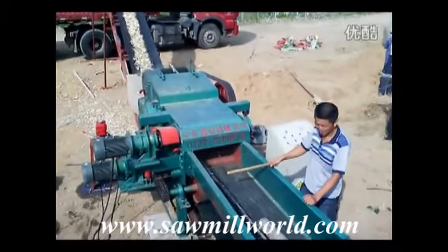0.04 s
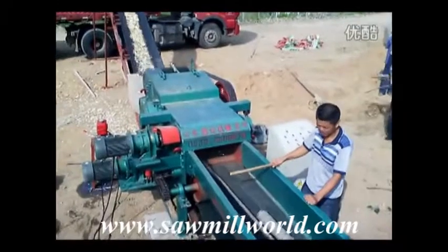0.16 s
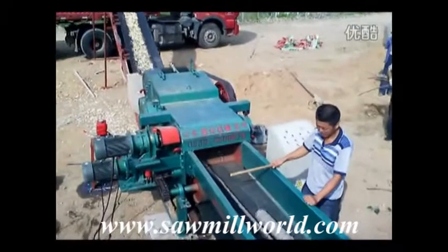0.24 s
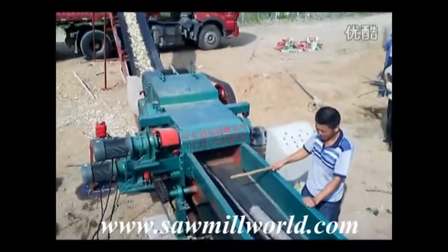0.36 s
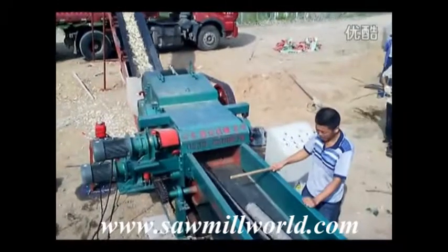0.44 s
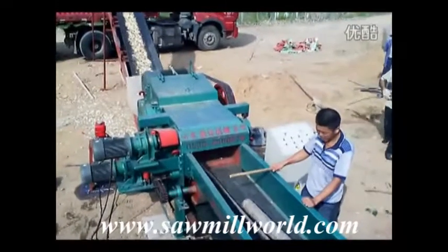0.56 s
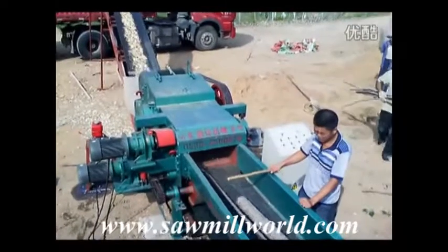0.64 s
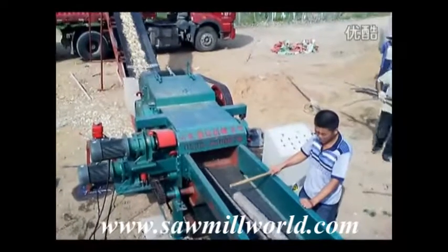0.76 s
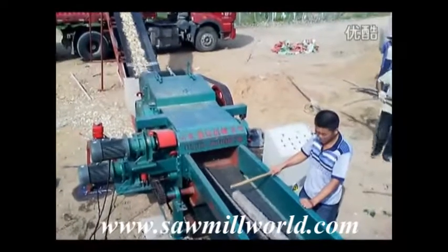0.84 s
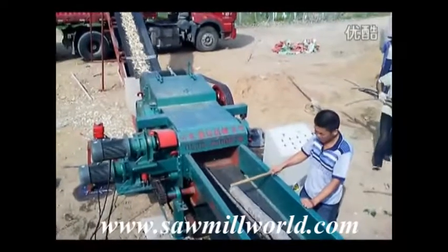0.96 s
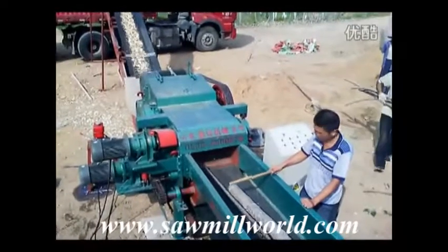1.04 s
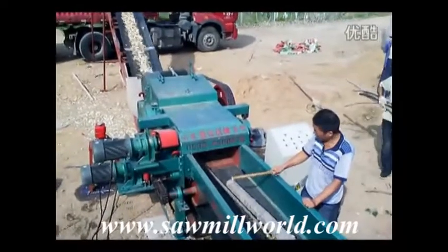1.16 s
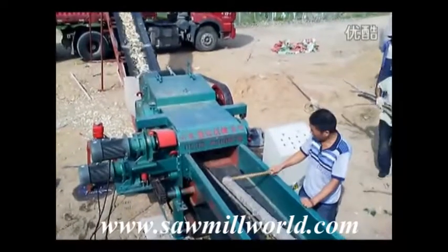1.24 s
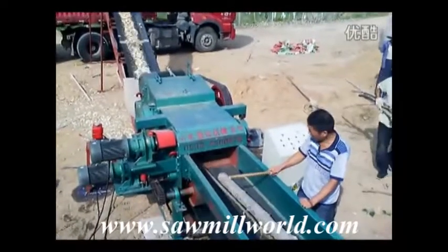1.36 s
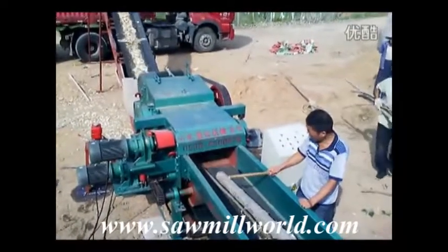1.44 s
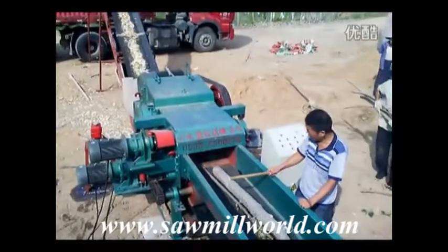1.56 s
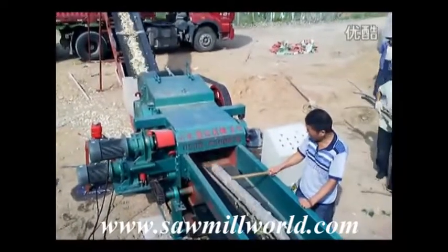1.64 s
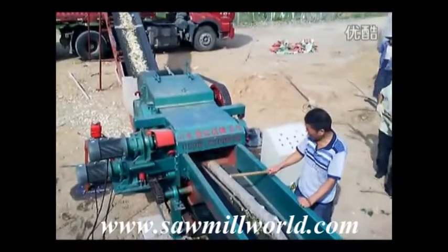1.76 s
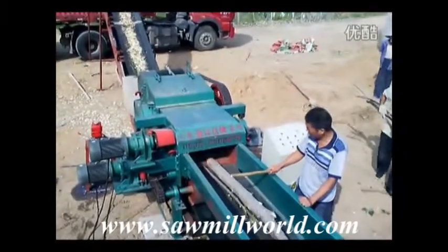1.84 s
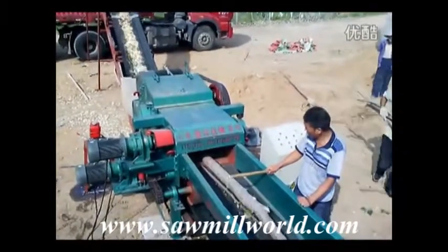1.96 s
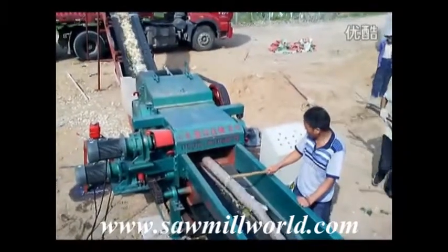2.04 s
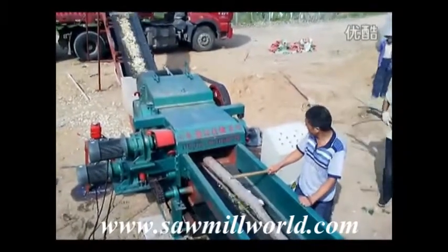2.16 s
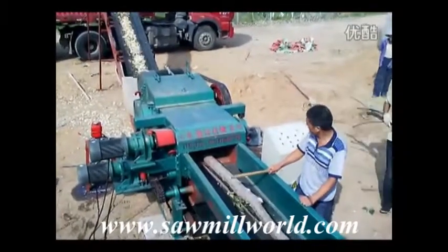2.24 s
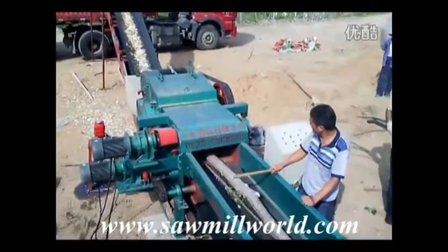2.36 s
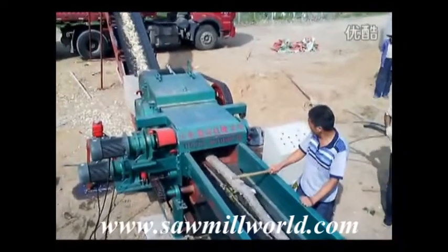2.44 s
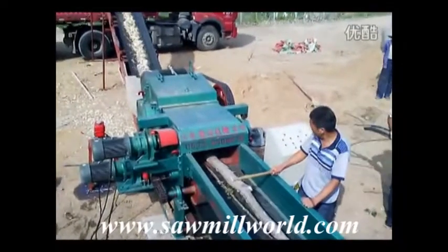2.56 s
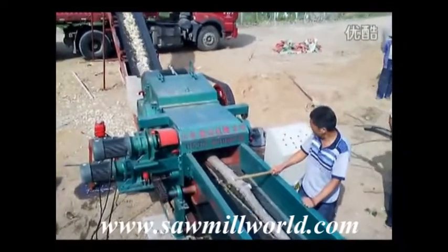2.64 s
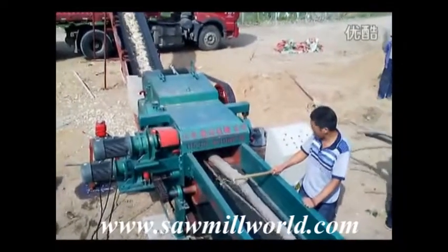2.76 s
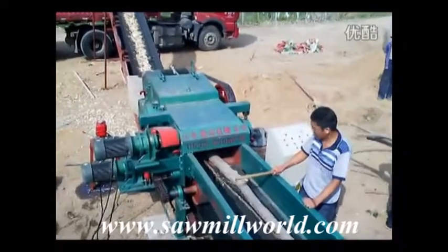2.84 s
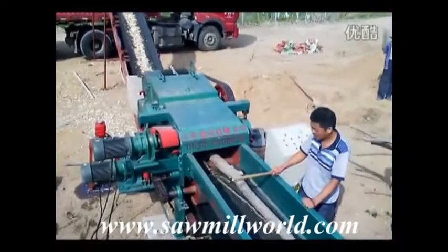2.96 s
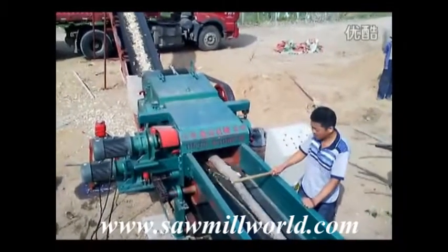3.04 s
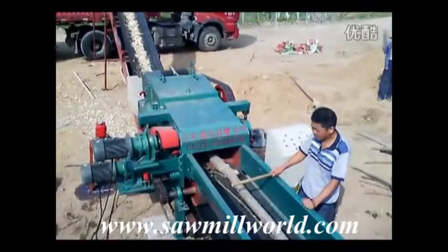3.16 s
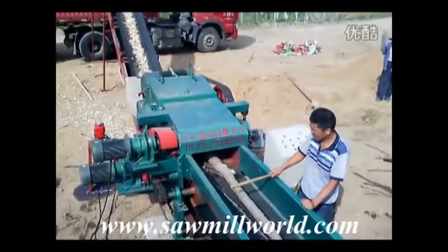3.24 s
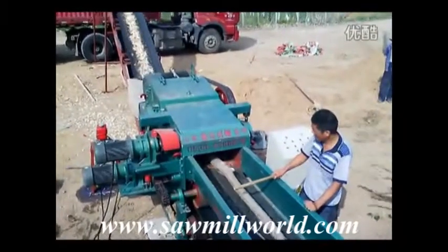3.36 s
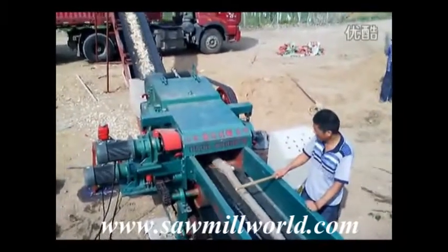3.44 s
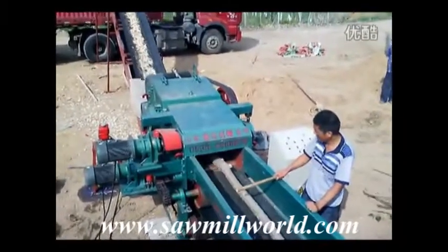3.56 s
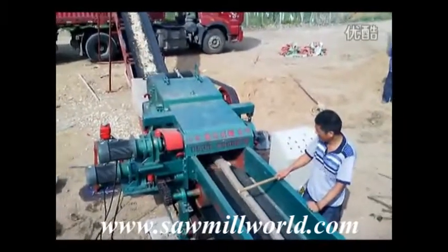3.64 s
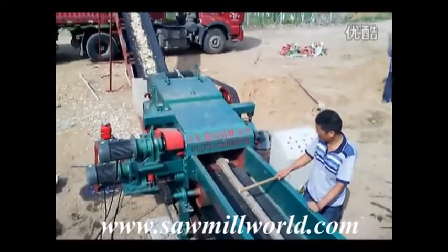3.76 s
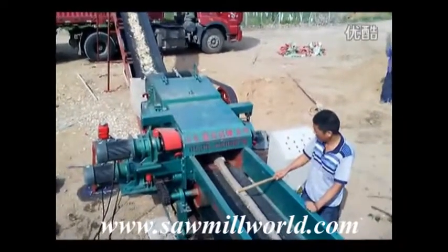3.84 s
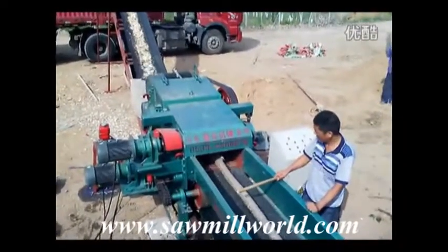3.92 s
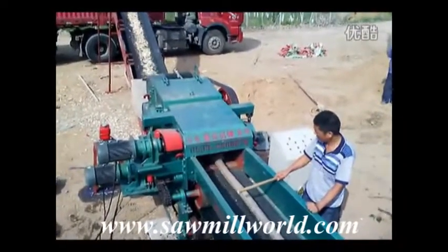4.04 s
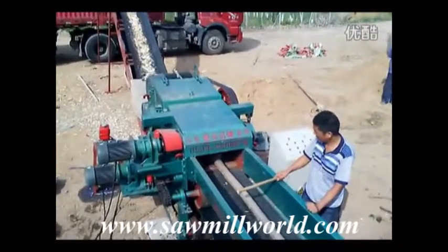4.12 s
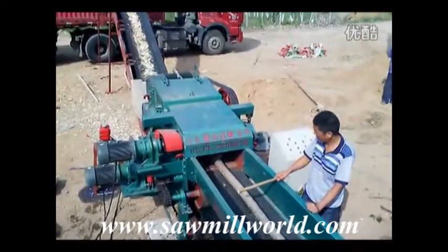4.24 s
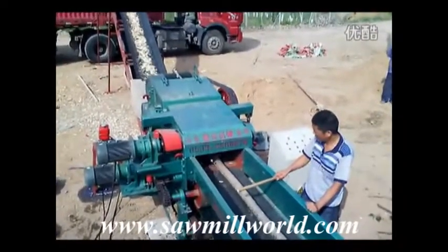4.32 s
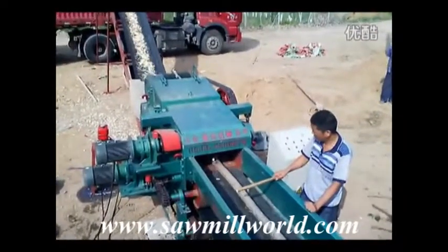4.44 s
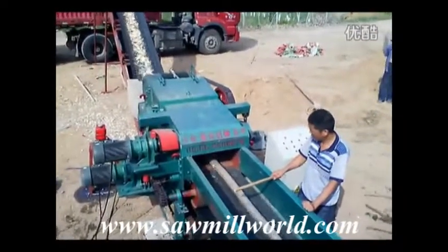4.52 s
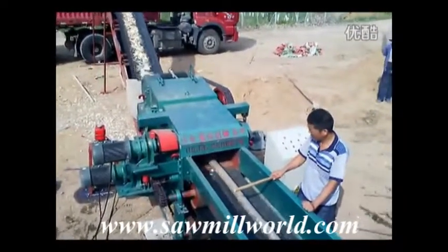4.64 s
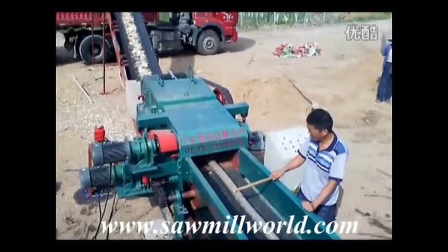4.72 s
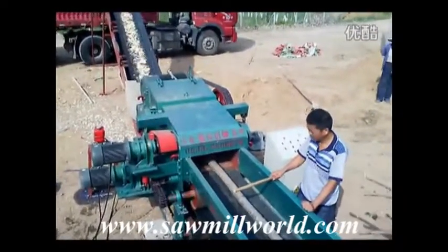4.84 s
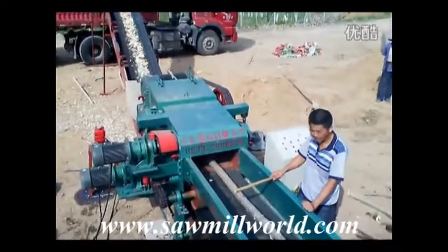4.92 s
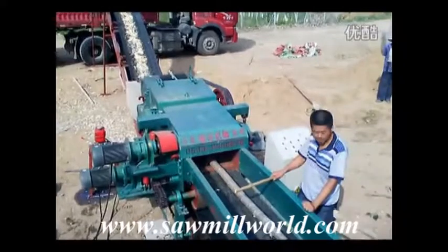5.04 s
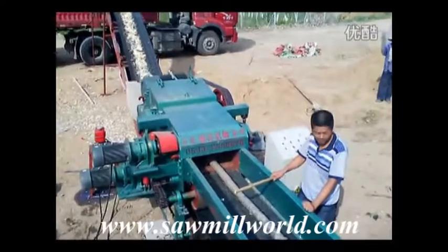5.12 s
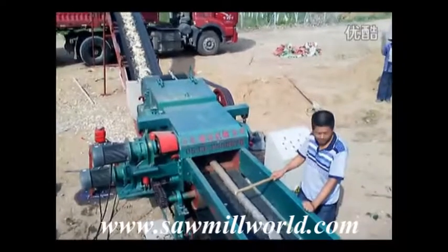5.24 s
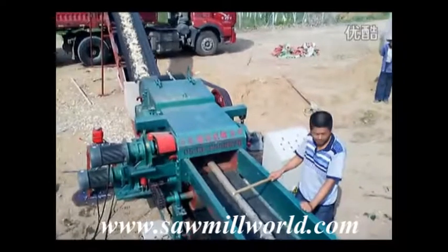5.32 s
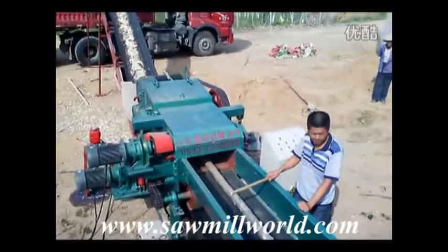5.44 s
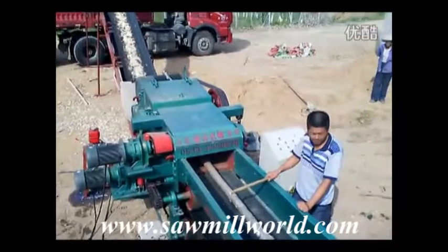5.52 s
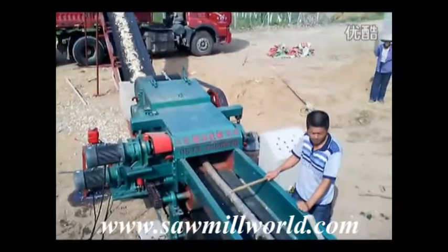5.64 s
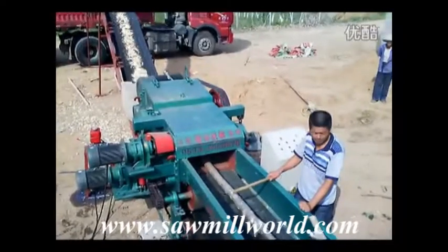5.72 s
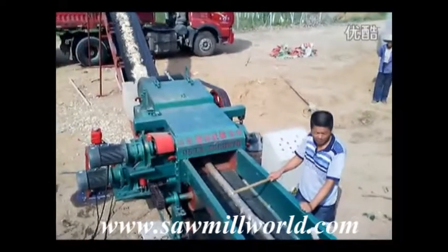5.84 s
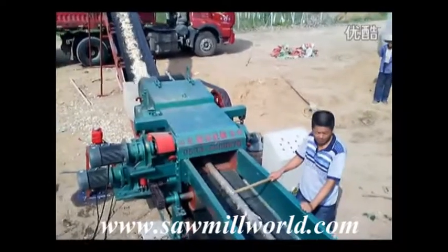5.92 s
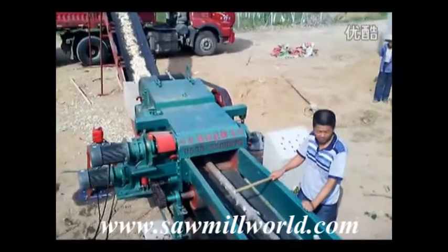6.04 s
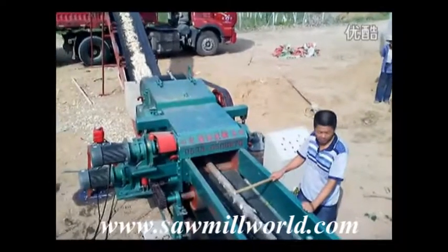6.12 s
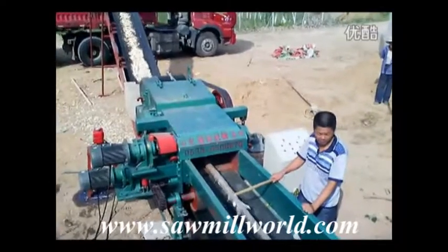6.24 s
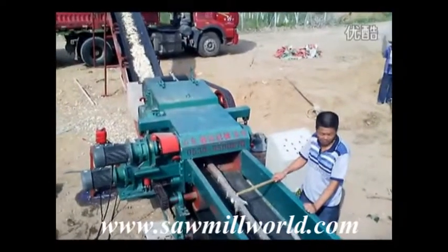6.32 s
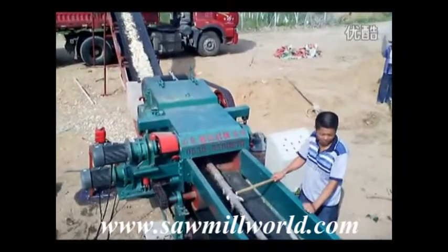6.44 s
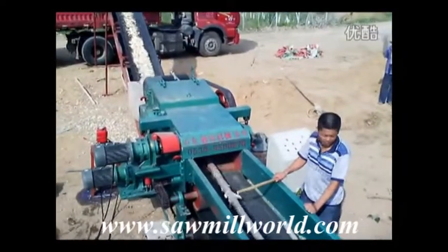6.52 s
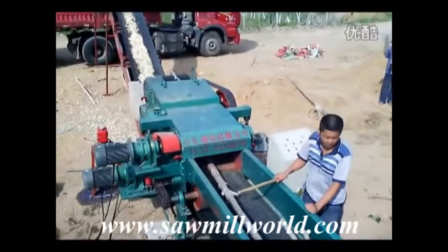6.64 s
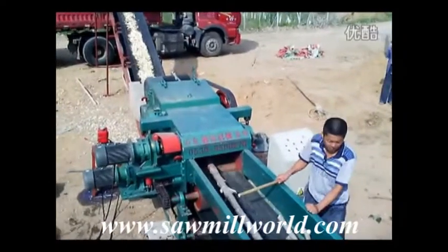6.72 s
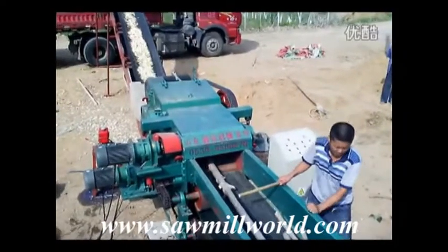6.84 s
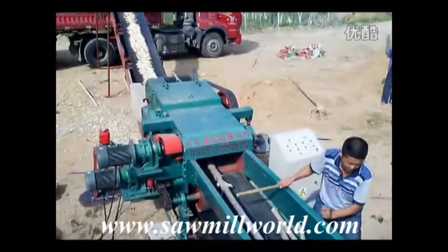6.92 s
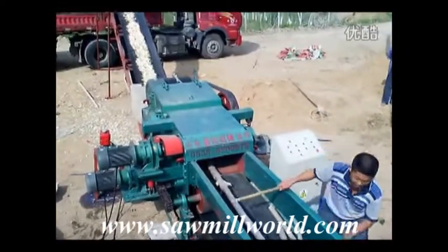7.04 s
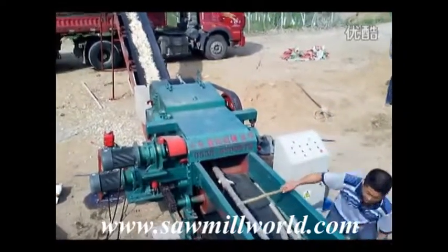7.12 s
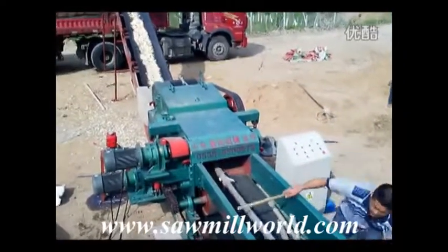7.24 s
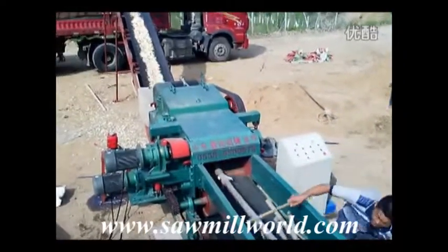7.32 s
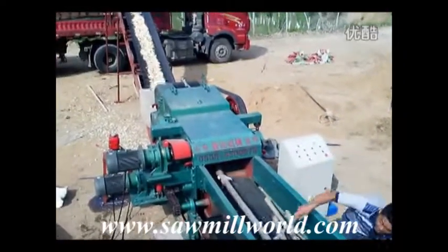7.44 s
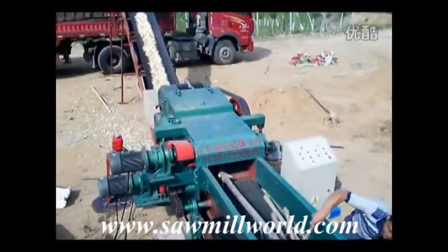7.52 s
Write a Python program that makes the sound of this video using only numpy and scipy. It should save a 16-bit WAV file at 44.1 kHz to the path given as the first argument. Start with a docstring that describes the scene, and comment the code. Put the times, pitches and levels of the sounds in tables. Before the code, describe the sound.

Quick bright knife ticks over a faint machine rumble fade down, then heavy wooden bumps, a short groan and sustained, violent, clattering log chipping.

```python
"""Drum chipper taking a log

An electric drum chipper runs in an open yard, its knives passing the anvil twenty times a second.
At first they only nick loose splinters, each a short burst of ringing noise. Then a log bumps and groans
under the feed roller, and every knife shears off a slice: a crack, a lower ring of the log, then
showers of chips round the steel hood. Motor tones, hum and a throbbing rumble lie beneath.
The loudest cuts overload the nearby microphone.
"""
import sys
import numpy as np
from scipy import signal
from scipy.fft import rfft, irfft, next_fast_len
from scipy.io import wavfile
from scipy.ndimage import uniform_filter1d, map_coordinates

SR = 44100
rng = np.random.default_rng(int(sys.argv[2]) if len(sys.argv) > 2 else 0)


def materialize(psi):
    """Save the field psi as 16-bit PCM at rate SR to the path in sys.argv[1].

    A 1-D psi becomes a single channel; in a 2-D psi each row is a channel.
    """
    bounded = np.clip(np.atleast_2d(psi).T, -1, 1)
    quanta = np.round(bounded * 32767).astype(np.int16)
    wavfile.write(sys.argv[1], SR, quanta)


N = 334278

# Levels are set before the ring of the hood and the microphone. Spectra give the balance only.

# running count of knives past the anvil: time_s, knife_passes
KNIFE_COUNT = [(0, -.6), (3.16, 63), (3.401, 68), (4.899, 98), (5.647, 113), (6.543, 131), (7.092, 142),
               (7.588, 152)]
BITE_S = 3.24  # the knives reach the log
HIT_S = np.arange(4096) / SR  # time since a blow: every blow is cut off after 93 ms

# how the log cuts as it feeds in; crack is the mean of the two knives:
# time_s, body_db, crack_db, crack_hz, spray_db
FEED = [(3.26, -45, -31.5, 2260, -37), (3.3, -45, -33, 2250, -45), (3.35, -18.5, -23.5, 1970, -24),
        (3.52, -26.5, -22.5, 2400, -30), (3.75, -13, -15, 2500, -24.5), (4.05, -22, -15, 2250, -25.5),
        (4.45, -16.5, -15.5, 2420, -28), (4.72, -14, -17, 2440, -26), (4.9, -20.5, -18, 2170, -26),
        (5.05, -14, -17, 2260, -33), (5.35, -12.5, -19, 2360, -32.5), (5.6, -18.5, -15, 2530, -29.5),
        (5.9, -21, -17.5, 2400, -27.5), (6.15, -37, -10.5, 2780, -24.5), (6.4, -30.5, -22, 2540, -27),
        (6.65, -15, -16, 2870, -25.5), (6.82, -27.5, -16.5, 2820, -27), (7.05, -19, -16.5, 2550, -28.5),
        (7.38, -20.5, -14, 2860, -23.5), (7.55, -32, -24, 2670, -35)]
# the first bite and the hardest blows, a full slice each: start_s, body_db, crack_db, crack_hz, clatter_db
HARD_CUTS = [(3.265, -29, -23, 2250, -21), (3.401, -13, -8.5, 2420, -18), (3.451, -17, -7.5, 2290, -35),
             (3.552, -15.5, -6, 2220, -23), (3.651, -13, -10.5, 2270, -22.5),
             (3.801, -15.5, -12, 2370, -20.5), (4.049, -17, -11, 2350, -18), (4.15, -15.5, -9, 2490, -37),
             (4.249, -18.5, -9.5, 2460, -35), (4.35, -21, -10, 2360, -27), (4.848, -13.5, -11, 2390, -32),
             (5.201, -22.5, -10.5, 2255, -26), (5.248, -12.5, -18.5, 2220, -22.5),
             (5.548, -22, -11.5, 2280, -26.5), (5.748, -22, -12, 2540, -18), (5.844, -22.5, -12, 2540, -21),
             (5.9439, -25, -10, 2410, -16.5), (6.045, -42, -10, 2520, -20),
             (6.1436, -28.5, -10.5, 2580, -17), (6.197, -36, -11, 2970, -19), (6.343, -14, -8, 2610, -25.5),
             (6.443, -14, -8.5, 2550, -37), (6.543, -15.5, -8, 2424, -29),
             (6.891, -10.5, -16.5, 3090, -21.5), (6.9922, -12.5, -18, 2540, -19.5),
             (7.241, -18, -12.5, 2720, -18), (7.438, -17.5, -14, 2960, -21)]
PROUD_DB = 1.65  # one knife stands proud: it cracks this much above the mean, its partner as much below
BODY_HZ, BODY_SAG_HZ_PER_S = 1450, 35  # the log's own ring at the bite, and its fall as the log feeds in
CLATTER_DB, FILL_DB, FILL_S = -19.5, 16.5, 0.15  # full hood; how much weaker at the bite; time to fill
CUT_SCATTER_DB, CUT_DETUNE, CUT_JITTER_S = 1.5, 0.057, 0.000802  # from one slice to the next
# chips clattering in the hood: freq_hz, relative_db
CLATTER_SPECTRUM = [(550, -35.5), (800, -17.5), (920, 1), (1400, 5.5), (1850, -3), (2400, 6.5),
                    (3100, -3.5), (3700, -3), (4300, -25.5), (7000, -58)]
# fine chips against the hood: freq_hz, relative_db
SPRAY_SPECTRUM = [(2500, -30), (3900, -19), (4850, -5), (5300, 0.5), (6100, 2.5), (7000, 8), (9000, -12.5),
                  (11000, -6), (15000, -27)]
# long splinters tearing off: time_s, level_db
TORN_SPLINTERS = [(3.25, -36), (3.45, -28.5), (4.3, -33.5), (4.75, -22.5), (5.05, -38.5), (7.5, -64)]
CHIP_RING_DB = 7  # typical spread of the resonances in the most ringing chip streams

# the loudest splinters nicked by a knife; a sharper one has a weaker tail:
# start_s, low_ring_db, high_ring_hz, high_ring_db, sharpness_db
LOUD_NICKS = [(0.08, -19.5, 5000, -31, -17), (.135, -22.5, 4840, -41, 11), (.278, -17.5, 4770, -32, -19),
              (.484, -28.5, 3460, -38, -17), (.629, -29.5, 4800, -17, 20.5), (.729, -26, 4110, -29.5, -9),
              (0.777, -31.5, 3800, -30, -3), (.927, -19.5, 4470, -20, 10), (.975, -24, 4820, -23, 18),
              (1.027, -25.5, 4670, -29.5, 19), (1.075, -30.5, 5020, -17.5, 28),
              (1.125, -30.5, 4900, -22.5, 21), (1.325, -31, 4800, -25, 20), (1.423, -27.5, 4890, -15, 23),
              (1.473, -26, 5000, -39, -2), (1.5206, -24, 5260, -36, 13), (1.918, -38, 4640, -26.5, 5),
              (1.966, -49, 4480, -33, 3), (2.116, -44, 5530, -32, -1), (2.465, -48, 3800, -34, 9),
              (3.112, -40, 5100, -37, -6)]
# the lighter debris that the other passes catch: time_s, low_ring_db, high_ring_db, spray_db
DEBRIS = [(0, -29, -52, -30.5), (.25, -26.5, -38, -39), (.42, -45, -57, -36.5), (.78, -28.5, -45, -28.5),
          (1.2, -34.5, -46, -34.5), (1.45, -49, -39, -25), (1.72, -37, -54.5, -40.5), (1.95, -61, -64, -26),
          (2.3, -44, -42.5, -53), (2.65, -50.5, -42, -35), (3.2, -56, -53, -54)]
NICK_LOW_HZ, NICK_HIGH_HZ, NICK_SHARP_DB = 2540, 4530, 13  # a typical splinter
NICK_SCATTER_DB, NICK_DETUNE = 4.5, 0.052  # from one splinter to the next

# the shuddering log and trough: time_s, thud_db, knock_db, groan_db, rattle_db
LOG_LEVELS = [(3.28, -12.5, -21, -23.5, -37), (3.4, -38, -32.5, -30.5, -27),
              (3.56, -31.5, -36.5, -61.5, -47), (3.72, -46.5, -29.5, -28.5, -40.5),
              (3.95, -35.5, -28.5, -32.5, -43.5), (4.15, -46, -30.5, -37.5, -32.5),
              (4.37, -48, -36.5, -46, -41), (4.62, -43.5, -39, -26.5, -29), (4.84, -41, -40.5, -28, -26),
              (4.94, -62.5, -47.5, -41.5, -36), (5.07, -32, -30.5, -29.5, -21), (5.22, -37, -46, -48, -40),
              (5.36, -30, -25.5, -27, -30.5), (5.52, -27, -41, -32, -32.5),
              (5.64, -47, -47.5, -46.5, -40.5), (6.4, -56.5, -59, -62, -46), (7.55, -55, -58, -54, -48.5)]
# lowest boom of the trough: freq_hz, relative_db
THUD_SPECTRUM = [(30, -19), (75, -20.5), (110, -11), (160, 4), (210, -1.5), (300, -24), (600, -100)]
# knocking of the trough: freq_hz, relative_db
KNOCK_SPECTRUM = [(140, -34.5), (220, -2), (255, 4.5), (295, 2), (350, -0.5), (520, -40.5)]
# groaning of the trough: freq_hz, relative_db
GROAN_SPECTRUM = [(250, -43), (360, 0.5), (410, 0), (460, -2), (515, -2), (600, -9), (850, -60)]
# rattling of the panels: freq_hz, relative_db
RATTLE_SPECTRUM = [(400, -57), (600, -5), (690, 0.5), (800, 3.5), (905, -6), (1050, 5), (1700, -36.5)]

# wood bumps the trough and the feed roller: start_s, pitch_hz, level_db, t60_s
BUMPS = [(.018, 173, -13.5, 0.071), (.414, 176, -27, 0.062), (.478, 193, -22.5, 0.082),
         (1.685, 301.5, -13.5, 0.088), (1.689, 398, -24.5, 0.2), (3.108, 160.5, -17, .45),
         (3.145, 185, -14.5, .13), (3.195, 154, -14, 0.29), (3.223, 155.5, -3, 0.22),
         (3.226, 275, -9.5, 0.098), (3.257, 793, -10.5, 0.076), (3.346, 160, -11, 0.094),
         (3.383, 308, -16, 0.23), (5.362, 151.5, -9.5, 0.066), (6.018, 197, -24, 0.063)]
BUMP_RISE_S = 0.017  # bark cushions every contact
# the log drags under the feed roller: time_s, pitch_hz, level_db
DRAG = [(3.255, 387, -52), (3.272, 406.7, -18.5), (3.32, 408.3, -14.5), (3.345, 416.5, -14),
        (3.365, 493, -14.5), (3.42, 476, -54)]
# resonances of the steel hood and trough: freq_hz, width_hz, strength_db
PANELS = [(249, 8.1, -10.5), (290.7, 9.3, 3.5), (409, 19, -4.5), (510, 9.6, -1.5), (895, 8.5, 6),
          (1400, 22, -20), (2420, 32, -8.5), (4480, 31, -3), (4814, 77, 4), (5990, 120, -0.5)]

# dust and crumbs sweeping the hood, before each knife's flick: time_s, level_db
DUST_LEVEL = [(0, -38), (1, -44.5), (1.9, -44), (2.6, -46.5), (3.2, -49.5)]
# dust and crumbs: freq_hz, relative_db
DUST_SPECTRUM = [(700, -13), (1500, 0.5), (2100, -0.5), (2550, -2.5), (3200, -0.5), (4700, -1.5), (6200, 0),
                 (7200, -8), (10000, -18)]
# rumble of the machine: freq_hz, relative_db
RUMBLE_SPECTRUM = [(30, -23.5), (72, -25.5), (130, -6.5), (200, -2.5), (290, -4.5), (370, -9), (480, -4),
                   (600, -16), (800, -15.5), (1150, -9), (2000, -17), (4000, -41), (7000, -35)]
# motor and gear tones, mean levels: pitch_hz, level_db
WHINE = [(404, -51), (1150, -54), (1178, -61.5), (2439, -58.5), (3714, -59.5)]

# response of the microphone: freq_hz, gain_db
MICROPHONE = [(20, -4.5), (7200, 0), (7550, -9), (7900, -34), (11300, -14.5), (11900, -66), (15000, -18.5)]
TOP_HZ = 15300  # nothing passes above this


def cuts():
    """The knife cracks through the log; the slice shatters and sprays against the hood a moment later."""
    out, rows = np.zeros(N), slices()
    for s, body_db, crack_db, crack_hz, _, body_hz, _ in rows:
        body_envelope = stroke(0.0021, 0.0075) + 0.22 * swell(0.012, 0.26)
        add(out, s - .0005, amp(body_db) * fracture(body_envelope, body_hz, 430, 0.014))
        tear_s = 0.007 * (crack_hz / 2400) ** 2  # thin slices ring higher and tear for longer
        crack_envelope = stroke(0.0022, tear_s) + 0.18 * swell(0.011, 0.18)
        add(out, s - .0005, amp(crack_db) * fracture(crack_envelope, crack_hz, 820, 0.011))
    return out + chip_showers(rows)


def chip_showers(rows):
    """Each slice feeds three streams of debris: coarse clatter, fine spray and torn splinters."""
    s, *_, clatter_db, _, spray_db = rows.T
    clatter = showers(s, clatter_db, delay=0.0026, rise=0.0096, t60=0.21)
    spray = showers(s, spray_db, delay=0.0031, rise=0.0029, t60=0.23)
    torn = showers(s, curves_at(TORN_SPLINTERS, s)[0], delay=0.0053, rise=0.0091, t60=0.17)
    torn_spectrum = [(2500, -24.5), (4000, 6), (5200, 4.5), (7500, -9.5)]
    out = clatter * rush(CLATTER_SPECTRUM, CHIP_RING_DB)
    out += spray * rush(SPRAY_SPECTRUM, CHIP_RING_DB)
    return out + torn * rush(torn_spectrum, CHIP_RING_DB)


def slices():
    """One slice a pass, knives in turn: start_s, body_db, crack_db, crack_hz, clatter_db, body_hz, spray_db."""
    number, times = knife_passes(BITE_S, N / SR)
    luck = rng.standard_normal((len(times), 7)).T
    body_db, crack_db, crack_hz, spray_db = curves_at(FEED, times)
    crack_db = crack_db + np.where(number % 2, PROUD_DB, -PROUD_DB)
    clatter_db = CLATTER_DB - FILL_DB * np.exp(-(times - BITE_S) / FILL_S)
    body_hz = BODY_HZ - BODY_SAG_HZ_PER_S * (times - BITE_S)
    levels_db = np.array([body_db, crack_db, clatter_db, spray_db])
    body_db, crack_db, clatter_db, spray_db = levels_db + CUT_SCATTER_DB * luck[:4]
    body_hz, crack_hz = np.array([body_hz, crack_hz]) * np.exp(CUT_DETUNE * luck[4:6])
    starts = times + CUT_JITTER_S * luck[6]
    ordinary = np.column_stack([starts, body_db, crack_db, crack_hz, clatter_db])
    return np.column_stack([with_loudest(ordinary, HARD_CUTS), body_hz, spray_db])


def nicks():
    """Before the log, each knife strikes a splinter that rings in two resonances and skitters in the hood."""
    _, times = knife_passes(0, BITE_S)
    luck = rng.standard_normal((len(times), 5)).T
    lows_db, highs_db, spray_db = curves_at(DEBRIS, times) + NICK_SCATTER_DB * luck[:3]
    lows_hz, highs_hz = np.array([[NICK_LOW_HZ], [NICK_HIGH_HZ]]) * np.exp(NICK_DETUNE * luck[3:])
    sharps_db = np.full(len(times), NICK_SHARP_DB)
    rows = with_loudest(np.column_stack([times, lows_db, highs_hz, highs_db, sharps_db]), LOUD_NICKS)
    out = np.zeros(N)
    blow = stroke(0.0016, 0.0064)
    skitter = 1.14 * stroke(.003, 0.019) + 0.66 * swell(0.022, 0.17)
    for (s, low_db, high_hz, high_db, sharp_db), low_hz in zip(rows, lows_hz):
        tail = 1 / (.5 + amp(sharp_db))
        add(out, s - .001, amp(low_db) * fracture(blow + (tail + 0.55) * skitter, low_hz, 790, 0.02))
        add(out, s - .001, amp(high_db) * fracture(blow + 1.3 * tail * skitter, high_hz, 840, 0.013))
    fine_spectrum = [(2000, -14.5), (3500, -3), (5300, -3), (6200, -10.0),
                     (7000, 0), (9000, -3.5), (11000, -17.5), (15000, -13.5)]
    spray = showers(rows[:, 0], spray_db, delay=0.0015, rise=0.0065, t60=0.12)
    return out + spray * rush(fine_spectrum, CHIP_RING_DB)


def log_shudder():
    """The log kicks back against the trough between cuts and shakes its panels."""
    thud_db, knock_db, groan_db, rattle_db = curves(LOG_LEVELS)
    gripped = np.clip((np.arange(N) / SR - BITE_S) / 0.017, 0, 1)
    kicks = amp(1.6 * np.cos(2 * np.pi * (curves(KNIFE_COUNT)[0] - .58)))
    trough = amp(thud_db) * rush(THUD_SPECTRUM)
    trough += amp(knock_db) * rush(KNOCK_SPECTRUM, ring_db=4.5)
    trough += amp(groan_db) * rush(GROAN_SPECTRUM, ring_db=4.5)
    rattle = amp(rattle_db) * rush(RATTLE_SPECTRUM, ring_db=6)
    return gripped * (kicks * trough + rattle)


def bumps():
    """Heavy, soft contacts make the steel panels boom."""
    out, t = np.zeros(N), np.arange(SR // 3) / SR
    for s, hz, db, t60 in BUMPS:
        decay = amp(-60 * np.maximum(t - BUMP_RISE_S, 0) / t60)
        envelope = np.minimum(t / BUMP_RISE_S, 1) ** 1.34 * decay
        phase = 2 * np.pi * hz * t + .8 * wobble(80)[:len(t)]  # bark makes the contact uneven
        add(out, s, amp(db) * envelope * np.sin(phase))
    return out


def drag():
    """Bark sticks and slips on the roller: a short, rough, rising groan of six harmonics."""
    hz, db = curves(DRAG)
    phase = 2 * np.pi * np.cumsum(hz * (1 + 0.0464 * wobble(250))) / SR
    slips = sum(amp(-5.5 * k + 3.4 * wobble(80)) * np.sin((k + 1) * phase) for k in range(6))
    floor = amp(max(db[0], db[-1]))  # taken off, so the groan is silent at both ends
    return np.maximum(amp(db) - floor, 0) * slips


def hood(x):
    """The steel panels ring on at their own pitches."""
    return filtered(x, lambda f: 1 + sum(amp(db) * mode(f, hz, width_hz) for hz, width_hz, db in PANELS))


def dust():
    """Each knife flicks crumbs round the hood: a sharp start, then a slower fade until the next knife."""
    since = (curves(KNIFE_COUNT)[0] - .05) % 1  # share of the way to the next knife
    flick = 0.36 + 1.2 * np.exp(-since / 0.52) + 2.0 * np.exp(-since / 0.037)
    return amp(curves(DUST_LEVEL)[0] + wobble(23)) * flick * rush(DUST_SPECTRUM, CHIP_RING_DB)


def air_throb():
    """A rumble and low puffs that throb as each knife pushes air past the anvil."""
    throb = np.cos(2 * np.pi * (curves(KNIFE_COUNT)[0] - .36))
    rumble = amp(-40.5 + 1.0 * throb + 0.38 * wobble(9.2)) * rush(RUMBLE_SPECTRUM, ring_db=4)
    puff_spectrum = [(120, -45.5), (230, -7), (290, 1.0), (400, -14.5), (700, -65)]
    return rumble + amp(-47.5 + 6.4 * throb) * rush(puff_spectrum)


def whine():
    """Motor and gear tones, wavering a little in level and phase."""
    t = np.arange(N) / SR
    return sum(amp(db + 2.4 * wobble(2.9)) * np.sin(2 * np.pi * hz * t + 0.34 * wobble(11))
               for hz, db in WHINE)


def hum():
    """The drive hums at 45 times the knife rate, louder once the log loads it."""
    load = np.clip((np.arange(N) / SR - 3.3) / 0.22, 0, 1)
    phase = 2 * np.pi * 45 * curves(KNIFE_COUNT)[0] + .3 * wobble(10)
    return amp(-55.5 + 12.4 * load) * amp(4.4 * wobble(7.6)) * np.sin(phase)


def knife_passes(start, end):
    """Numbers and times of the knife passes between two moments."""
    s, count = np.transpose(KNIFE_COUNT)
    number = np.arange(count[-1])
    times = np.interp(number, count, s)
    inside = (times > start) & (times < end)
    return number[inside], times[inside]


def with_loudest(ordinary, loudest):
    """Event rows in which each loud event takes the place of the nearest ordinary one."""
    rows = np.array(ordinary)
    for row in loudest:
        rows[np.argmin(np.abs(rows[:, 0] - row[0]))] = row
    return rows


def fracture(envelope, hz, width_hz, span):
    """Snapping fibres ring a resonance, four equal stages deep; rms 1 over the first span seconds."""
    snaps = grains(len(HIT_S) + 256, 4)
    ring = signal.hilbert(filtered(snaps, lambda f: mode(f, hz, width_hz) ** 4))[256:]
    # the blade presses steadily, so the ring keeps much the same strength through the stroke
    power = np.abs(ring) ** 2
    ring = ring.real / np.sqrt(power + 2 * np.mean(power)) * envelope
    return ring / np.sqrt(np.sum(ring ** 2 * (HIT_S < span)) / (span * SR))


def stroke(rise, length):
    """Envelope of a blade in the wood: it bites, holds and breaks through."""
    bite = np.sin(np.pi / 2 * np.minimum(HIT_S / rise, 1)) ** 2
    return bite / np.sqrt(1 + (HIT_S / length) ** 10)


def swell(rise, t60):
    """Envelope that climbs smoothly to 1 and dies away."""
    climb = np.sin(np.pi / 2 * np.minimum(HIT_S / rise, 1)) ** 2
    return climb * amp(-60 * np.maximum(HIT_S - rise, 0) / t60)


def showers(times, levels_db, delay, rise, t60):
    """Strength of a chip stream that every knife feeds anew; overlapping showers add in power."""
    power = np.zeros(N)
    for s, db in zip(times, levels_db):
        add(power, s + delay, (amp(db) * swell(rise, t60)) ** 2)
    return np.sqrt(power)


def rush(spectrum, ring_db=0):
    """A stream of impacts of rms 1; brief random resonances stand out by a typical ring_db."""
    z = signal.stft(grains(N, 4), nperseg=512)[2]
    field = uniform_filter1d(rng.standard_normal(z.shape), size=2, axis=0)  # smooth across frequency
    field = uniform_filter1d(field, size=5, axis=1)  # and over time
    gain = amp(ring_db * np.clip(unit(field), -2, 2))
    chips = signal.istft(z * gain, nperseg=512)[1][:N]
    return unit(colour(chips, spectrum))


def grains(n, spread_db):
    """Dense tiny impacts of very unequal size."""
    return unit(rng.standard_normal(n) * amp(spread_db * rng.standard_normal(n)))


def mode(f, hz, width_hz):
    """Response of one resonance."""
    return 1j * f * width_hz / (hz * hz - f * f + 1j * f * width_hz)


def filtered(x, response):
    """x times a response of frequency."""
    n = x.shape[-1]
    m = next_fast_len(n + 4096)  # room for the tail
    return irfft(rfft(x, m) * response(np.fft.rfftfreq(m, 1 / SR)), m)[..., :n]


def colour(x, points):
    """x shaped by (Hz, dB) points on a log axis."""
    f, db = np.transpose(points)
    return filtered(x, lambda hz: amp(np.interp(np.log(hz + 1), np.log(f), db)))


def curves(rows):
    """One value per sample for each column after the time."""
    return curves_at(rows, np.arange(N) / SR)


def curves_at(rows, times):
    """Each column after the time, read at the given moments."""
    s, *cols = np.transpose(rows)
    return [np.interp(times, s, c) for c in cols]


def wobble(rate):
    """A smooth random curve with rate knots a second."""
    knots = rng.standard_normal(int(N * rate / SR) + 4)
    return map_coordinates(knots, [np.arange(N) * rate / SR])


def add(track, s, sound):
    """Mix a sound into the track at time s."""
    part = track[max(round(s * SR), 0):][:len(sound)]
    part += sound[:len(part)]


def amp(db):
    """Decibels to gain."""
    return 10 ** (np.asarray(db) / 20)


def unit(x):
    """Scale to rms 1."""
    return x / np.sqrt(np.mean(x ** 2) + 1e-20)


def scene():
    """The machine is straight ahead; a faint, blurred copy of it is added to one channel and taken from the
    other."""
    mid = hood(cuts() + nicks() + log_shudder()) + bumps() + drag()
    mid += dust() + air_throb() + whine() + hum()
    scatter = rng.standard_normal(len(HIT_S)) * swell(.001, .04)
    side = signal.fftconvolve(mid, scatter / np.linalg.norm(scatter))[:N]
    side = colour(side, [(30, -9.5), (70, -23.5), (170, -45.5), (350, -47.5), (700, -31.5),
                         (1500, -27.5), (3000, -19.5), (6000, -22), (12000, -10.5)])
    return np.array([mid + side, mid - side])


def record(dry):
    """The microphone dulls the treble, rounds off the loudest peaks and passes nothing above TOP_HZ."""
    dull = colour(dry, MICROPHONE)
    rounded = dull / (1 + np.abs(dull) ** 8) ** (1 / 8)
    return filtered(rounded, lambda hz: hz < TOP_HZ)


dry = scene()
out = record(dry)
materialize(out)
```